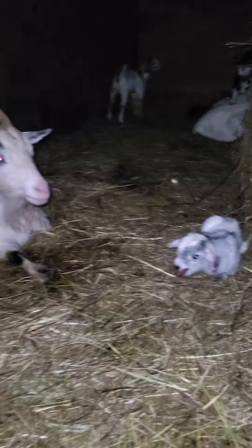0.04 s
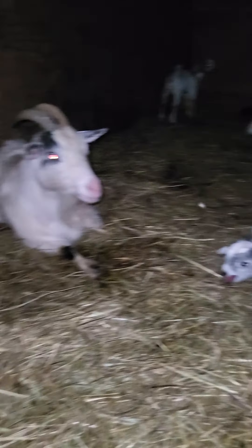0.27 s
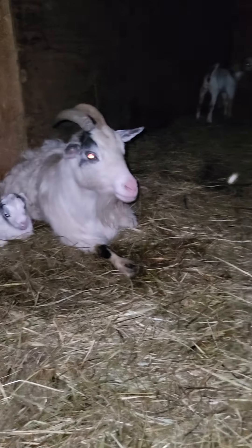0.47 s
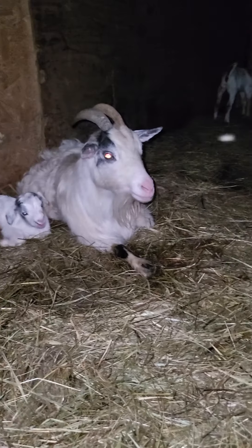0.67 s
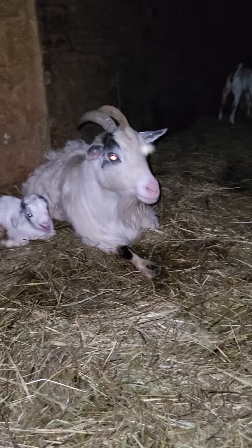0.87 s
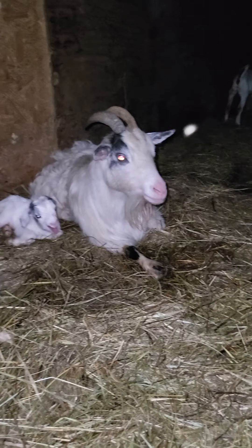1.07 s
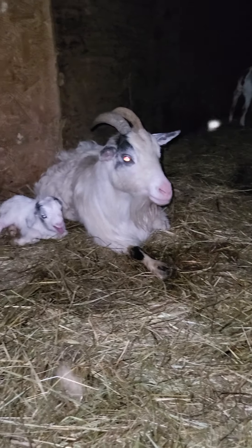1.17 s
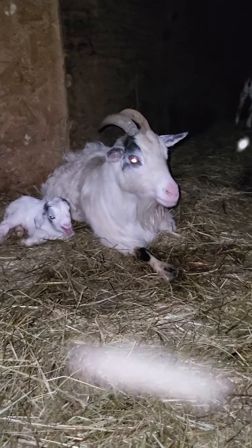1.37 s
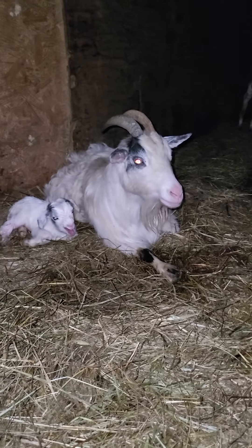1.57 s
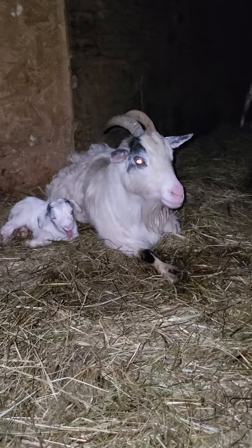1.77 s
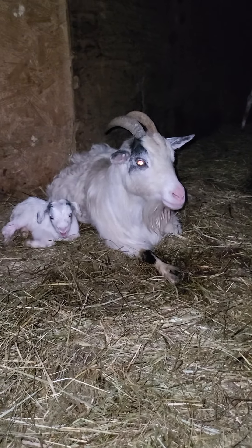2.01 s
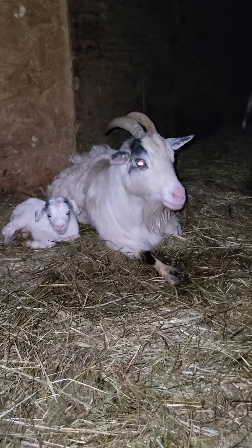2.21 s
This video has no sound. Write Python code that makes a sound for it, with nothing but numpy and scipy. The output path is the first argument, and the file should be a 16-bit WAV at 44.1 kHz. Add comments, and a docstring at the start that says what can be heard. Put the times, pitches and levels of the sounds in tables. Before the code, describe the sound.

Two young goats give long, high, quavering bleats that overlap, close by in a quiet barn

```python
"""A quiet straw-lined barn, where two young goats give long, high, overlapping bleats close by.
Each bleat stacks overtones on a quavering pitch, coloured by a moving mouth resonance, with breath noise
and short raspy catches in the throat. Shaped noise gives a low rumble, a faint hiss, a rustle of straw
and a thin far tone; random reflections dulled by straw give the goats a short tail."""
import sys
import numpy as np
from scipy import signal
from scipy.fft import rfft, irfft
from scipy.io import wavfile
from scipy.ndimage import uniform_filter1d

SR = 44100
rng = np.random.default_rng(int(sys.argv[2]) if len(sys.argv) > 2 else 0)


def output_pcm(signal):
    """Save a mono or channel-first signal as 16-bit PCM at the path in sys.argv[1].

    Samples are clipped to [-1, 1] before scaling.
    """
    pcm = np.clip(np.atleast_2d(signal).T, -1, 1) * 32767
    wavfile.write(sys.argv[1], SR, np.round(pcm).astype(np.int16))


N = 99225

# Path of each bleat; levels are relative
# time_s, pitch_hz, mouth_level_db, mouth_resonance_hz, upper_overtones_db
FIRST_BLEAT = [(0.0, 558, -53.5, 2250, -37), (0.032, 534.8, -60, 2470, -45.5),
               (0.058, 558, -52.5, 2210, -35), (0.165, 536.3, -51, 2420, -33),
               (0.218, 549.7, -47, 2270, -25), (0.296, 552.7, -39.5, 2270, -23),
               (0.312, 564, -39, 2400, -19.5), (0.448, 584, -32, 1984, -21.5),
               (0.493, 572, -31.0, 1960, -19.0), (0.52, 585.2, -29, 1990, -17.5),
               (0.847, 590, -32, 1883, -19.5), (0.896, 585.5, -28.5, 1971, -20.5),
               (0.926, 580, -26, 2050, -19.5), (0.954, 593, -29.5, 2010, -12.5),
               (0.985, 577.7, -24.5, 2068, -17.5), (1.044, 573.7, -33.5, 2014, -18.5),
               (1.095, 581.7, -22.5, 2080, -23), (1.109, 530, -34, 1970, -18.5),
               (1.118, 523, -41, 753, -43.5), (1.138, 440, -49, 600.0, -55.5), (1.172, 406, -67, 513, -56)]
SECOND_BLEAT = [(0.699, 592.5, -55, 2180, -52), (0.76, 607.5, -40, 2183, -37),
                (0.8, 628.7, -27.5, 2185, -27), (0.895, 636.6, -25.5, 2212, -20.5),
                (0.921, 650.5, -19.5, 2230, -25), (0.969, 644.7, -22, 2280, -13.5),
                (1.004, 681.5, -24.5, 2010, -12.5), (1.059, 669.5, -28, 2050, -15.5),
                (1.072, 695.5, -19, 2196, -14), (1.096, 710.8, -25.5, 2200, -16),
                (1.126, 680.3, -16.5, 2280, -13.5), (1.143, 716.4, -18.5, 2315, -14.5),
                (1.24, 727.8, -19.5, 2297, -14), (1.292, 697.5, -24.5, 2172, -15),
                (1.317, 705.6, -20, 2260, -15.5), (1.401, 697.3, -24.5, 2197, -15),
                (1.416, 677, -14.5, 2263, -12), (1.447, 707, -25.5, 2164, -16),
                (1.491, 683, -23.5, 2170, -15), (1.522, 697, -24.5, 2183, -15),
                (1.546, 670.6, -17, 2324, -14.5), (1.588, 664, -21.5, 2316, -17.5),
                (1.702, 634.2, -20, 2180, -16.5), (1.75, 624.6, -24, 2262, -23),
                (1.81, 617, -26, 2350, -18), (1.856, 600.5, -30, 2303, -22.5),
                (1.883, 538, -22.5, 1970, -26), (1.902, 488, -45, 1570, -44.5)]
# Width of the mouth resonance at half its peak gain: width_hz for the first and the second bleat
MOUTH_WIDTH = [344, 308]
# Low overtones that leak under the mouth resonance, per bleat: frequency_hz, level_db (re the chest level)
CHEST_LEAK = [
    [(560, -32), (1150, -30), (2900, -11.5), (3500, -5)],
    [(620, -21.5), (720, -29.5), (1300, -26.5), (2800, -3), (3400, -27)],
]
# Colour of the upper overtones, per bleat: frequency_hz, level_db (re their moving level)
UPPER_COLOUR = [
    [(2800, -45.5), (3500, -48.5), (4100, -17), (4700, -14), (5300, -7), (5850, -9), (6450, -5),
     (7400, -20.5), (8200, -14), (8900, -32), (9700, -37.5), (11200, -29), (13000, -30.5), (15500, -31.5)],
    [(2800, -88), (3600, -20.5), (4250, -11.5), (5000, -2), (5700, -4), (6300, -7), (7000, -9),
     (7800, -7.5), (8500, -29), (9200, -29), (10500, -27.5), (12500, -26.5), (15500, -39.5)],
]
# Colour that a narrower mouth adds to the upper overtones, per bleat: frequency_hz, change_db (at share 1)
NARROW_COLOUR = [
    [(3300, 7), (4400, 8.5), (5300, -18), (6400, -11.5), (7300, 19), (8200, 2.5)],
    [(3600, -13.5), (4300, 13), (5000, -14.5), (5750, 9.5), (6400, -8.5), (7200, -1)],
]
# How narrow the mouth is, per bleat: time_s, share (0-1)
NARROW_SHARE = [
    [(.37, 0.48), (.44, 0.01)],
    [(1.08, 0.0), (1.14, 0.6), (1.27, 0.44), (1.3, 0.0), (1.56, 0.01), (1.66, 0.11)],
]
# How much louder the left side is, per bleat: frequency_hz, left_over_right_db
SIDE_BALANCE = [
    [(700, 3), (2400, 7), (4400, -1.5), (5300, -11), (6400, 4), (8200, 10.5), (10000, 8.5), (15000, -7)],
    [(700, 4), (2400, 0.5), (4400, -1.5), (5300, 4), (6400, 5.5), (8200, 12.5), (10000, 5), (15000, -16)],
]
# How much later the left side arrives: delay_s for the first and the second bleat
LEFT_DELAY = [.00002, -0.000068]
# Colour of the breath noise: frequency_hz, level_db (re the overtones)
BREATH_COLOUR = [(1000, 1), (1600, -10), (2100, 0), (2600, -8), (3500, -24), (4500, 0), (9000, 0),
                 (12000, 7)]
# Catches in the throat: bleat (0 or 1), centre_s, length_s, dip_db, rasp_db (re the throat colour)
THROAT_CATCHES = [(0, .945, .02, -2, -13), (0, 1.122, .018, -3, -3), (1, 1.163, .006, -6, -18),
                  (1, 1.237, .007, -4, -16), (1, 1.308, .008, -5, -11), (1, 1.415, .013, -11, -16),
                  (1, 1.548, .014, -8, -11), (1, 1.662, .008, -10, -9), (1, 1.783, .008, -8, -10),
                  (1, 1.888, .022, -9, -6)]
# Spectrum of the barn air: frequency_hz, level_db (per Hz, relative)
AIR_COLOUR = [(25, -16.5), (45, -8), (60, -1), (85, -7), (160, -18.5), (300, -34.5), (450, -39.5),
              (2800, -54), (3600, -27), (4600, -38.5), (6000, -53.5), (10000, -69), (12500, -47),
              (15600, -56.5)]
# Slow swell of the barn air: time_s, change_db
AIR_LEVEL = [(0, -1.5), (.4, 4), (1.299, 0.5), (2.25, -3.5)]
# Left-right likeness of the barn air: frequency_hz, likeness (0-1)
AIR_LIKENESS = [(60, 1), (300, .9), (700, .45), (3000, .02)]
# Barn tails: t60_s, level_db
BARN_TAILS = [(.13, -11), (.42, -27)]
# Patches of band noise, a rustle of straw and a thin far tone: centre_s, length_s, level_db, centre_hz, width_hz
RUSTLE_PATCHES = [(0.123, 0.059, -66, 1100, 900), (2.024, 0.056, -76.5, 1346, 40)]

OVERTONES = 30
# Each overtone wavers, in full from WAVER_FULL_HZ up; APART is the share unlike on the two sides
WAVER, WAVER_HZ, WAVER_FULL_HZ, APART = .75, 80, 13000, .8
JITTER, JITTER_S = .0021, .007  # fine pitch tremble: rms share of the pitch, smoothing time
CHEST_FOLLOWS, CHEST_AT_DB = 0.067, -31  # the lowest overtones follow only part of the swell around this level
# Throat noise in gusts, once the first mouth opens wide
BREATH_DB, BREATH_FROM_S, GUST_DB, GUST_HZ = -23, .4, 4, 30
AIR_DB = -51.5  # before its swell
BARN_DULL_HZ, EDGE_HZ = 3000, 15700  # tail low-pass, top of the whole band

# Clocks: every sample, every 64th for slow curves, and the noise spectra's frames and bins
t, coarse = np.arange(N) / SR, np.arange(N // 64 + 2) * 64 / SR
frames, bins = np.arange(N // 128 + 5) * 128 / SR, np.fft.rfftfreq(512, 1 / SR)[:, None]


def amp(db):
    """Decibels to a linear gain."""
    return 10 ** (np.asarray(db) / 20)


def evened(x):
    """Scale to rms 1."""
    return x / np.sqrt(np.mean(x ** 2) + 1e-20)


def read(points, hz):
    """Read a curve of (Hz, value) points along log frequency."""
    f, value = np.transpose(points)
    return np.interp(np.log(hz + 1), np.log(f + 1), value)


def over_time(points, at):
    """Read a curve of (s, value) points at the given times."""
    return np.interp(at, *np.transpose(points))


def shaped(gain_db, same):
    """Stereo noise whose short-time spectra (bins x frames) follow gain_db; white at 0 dB has rms 1."""
    a, b, c, d = rng.standard_normal((len(frames), 257, 4)).T
    left = a + 1j * b
    right = same * left + np.sqrt(1 - same ** 2) * (c + 1j * d)
    z = np.array([left, right])
    level = signal.istft(z[0], nperseg=512, noverlap=384)[1].std()
    return signal.istft(z * amp(gain_db), nperseg=512, noverlap=384)[1][:, :N] / level


def slow(rows, rate_hz):
    """Smooth random curves of rms 1, one value every 64 samples."""
    z = rfft(rng.standard_normal((rows, 2048)))
    hz = np.fft.rfftfreq(2048, 64 / SR)
    out = irfft(z / (1 + (hz / rate_hz) ** 2) ** 2)[:, :len(coarse)]
    return out / out.std(1, keepdims=True)


def throat(which, hz, at, mouth_db, mouth_hz, bright_db):
    """Gain at hz: the moving mouth resonance, what leaks under it, and the upper band."""
    peak = 1 / (1 + (2 * (hz - mouth_hz) / MOUTH_WIDTH[which]) ** 2)
    follows = CHEST_FOLLOWS + (1 - CHEST_FOLLOWS) * np.minimum(hz / 2000, 1)
    chest_db = CHEST_AT_DB + follows * (mouth_db - CHEST_AT_DB)
    leak = amp(chest_db + read(CHEST_LEAK[which], hz)) / (1 + (hz / 3800) ** 8)
    narrow_db = over_time(NARROW_SHARE[which], at) * read(NARROW_COLOUR[which], hz)
    upper = amp(bright_db + read(UPPER_COLOUR[which], hz) + narrow_db)
    return np.hypot(2 * amp(mouth_db) * peak, leak) + upper


def voiced(which, pitch, partial, gain):
    """Overtones of a trembling pitch, each wavering by itself and partly unlike on the two sides."""
    tremble = evened(uniform_filter1d(rng.standard_normal(N), int(JITTER_S * SR)))
    hz = uniform_filter1d(pitch, 300) * (1 + JITTER * tremble)
    k = np.arange(1, OVERTONES + 1)[:, None]
    start = rng.uniform(0, 2 * np.pi, (OVERTONES, 1))
    waves = np.exp(1j * (2 * np.pi * k * np.cumsum(hz) / SR + start))
    depth = WAVER * np.minimum(partial / WAVER_FULL_HZ, 1)

    def drift():
        return slow(OVERTONES, WAVER_HZ) + 1j * slow(OVERTONES, WAVER_HZ)

    both, out = drift(), np.zeros((2, N))
    for ch, sign in enumerate((.5, -.5)):  # left, right: half the side difference each
        wander = np.sqrt(1 - APART ** 2) * both + APART * drift()
        waver = (1 + depth * wander) / np.sqrt(1 + 2 * depth ** 2)
        level = gain * waver * amp(sign * read(SIDE_BALANCE[which], partial))
        level = level * (partial < EDGE_HZ + 600)
        level = level * np.exp(-2j * np.pi * partial * sign * LEFT_DELAY[which])  # delay as phase
        out[ch] = sum((np.interp(t, coarse, level[row]) * waves[row]).real for row in range(OVERTONES))
    return out


def breath(colour_db):
    """Gusty throat noise, coloured by the same throat as the overtones."""
    gusts = amp(BREATH_DB + GUST_DB * np.interp(t, coarse, slow(1, GUST_HZ)[0]))
    opening = np.clip((t - BREATH_FROM_S) * 20, 0, 1)
    return gusts * opening * shaped(colour_db + read(BREATH_COLOUR, bins), 0.26)


def bleat(which, table):
    """Overtones and breath from one throat, dipped by short catches that rasp."""
    s, *cols = np.transpose(table)

    def on(at):  # 4.9 ms fades; a bleat that starts at 0 s is already sounding
        return np.clip(np.minimum(at - s[0] + (s[0] == 0), s[-1] - at) / 0.0049, 0, 1)

    def throat_gain(hz, at):
        return throat(which, hz, at, *[np.interp(at, s, c) for c in cols[1:]])

    partial = np.arange(1, OVERTONES + 1)[:, None] * np.interp(coarse, s, cols[0])
    gain = np.sqrt(2) * throat_gain(partial, coarse) * on(coarse)
    voice = voiced(which, np.interp(t, s, cols[0]), partial, gain)
    colour_db = 20 * np.log10(6 * throat_gain(bins, frames) * (on(frames) + 1e-6))
    bumps = [(np.exp(-2 * ((t - centre) / length) ** 2), dip_db, rasp_db)
             for w, centre, length, dip_db, rasp_db in THROAT_CATCHES if w == which]
    dips = amp(sum(bump * dip_db for bump, dip_db, _ in bumps))
    rasp = shaped(colour_db + .5 * read(BREATH_COLOUR, bins), 1.0)
    rasp = rasp * sum(bump * amp(rasp_db) for bump, _, rasp_db in bumps)
    return (voice + breath(colour_db)) * dips + rasp


def air():
    """Low rumble and a faint band of hiss: noise swelling a little, most alike on both sides in the lows."""
    hz = np.fft.rfftfreq(N, 1 / SR)
    left, other = rfft(rng.standard_normal((2, N)))
    same = np.clip(read(AIR_LIKENESS, hz), -1, 1)
    right = same * left + np.sqrt(1 - same ** 2) * other
    noise = evened(irfft(np.array([left, right]) * amp(read(AIR_COLOUR, hz)), N))
    return amp(AIR_DB + over_time(AIR_LEVEL, t)) * noise


def barn(x):
    """A quick and a faint slower tail of random reflections, dulled by straw."""
    tail_t = np.arange(SR // 2) / SR
    tail = sum(amp(db) * evened(amp(-60 * tail_t / t60)) * rng.standard_normal((2, len(tail_t)))
               for t60, db in BARN_TAILS) / np.sqrt(len(tail_t))
    tail = tail * (tail_t > .003)  # no reflection in the first 3 ms
    tail = signal.lfilter(*signal.butter(1, BARN_DULL_HZ, fs=SR), tail)
    return signal.fftconvolve(x, tail, axes=1)[:, :N]


def straw():
    """Short soft patches of noise, bell-shaped in time and frequency; the narrow one sounds as a thin tone."""
    gain = 0
    for centre, length, db, hz, width in RUSTLE_PATCHES:
        patch = np.exp(-((frames - centre) / length) ** 2 - ((bins - hz) / width) ** 2)
        gain = gain + amp(db) * np.sqrt(SR / width) * patch
    return shaped(20 * np.log10(gain + 1e-9), 0.3)


def scene():
    """Two goats and their barn tail, over the straw and the air."""
    goats = bleat(0, FIRST_BLEAT) + bleat(1, SECOND_BLEAT)
    return goats + barn(goats) + straw() + air()


def record(dry):
    """Clip any peak beyond full scale, then limit the band."""
    low_pass = signal.firwin(511, EDGE_HZ, window=("kaiser", 9), fs=SR)
    return signal.oaconvolve(np.clip(dry, -1, 1), low_pass[None], "same")


dry = scene()
out = record(dry)
output_pcm(out)
```